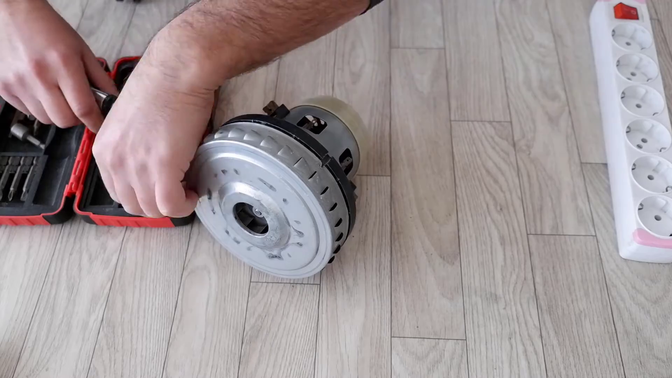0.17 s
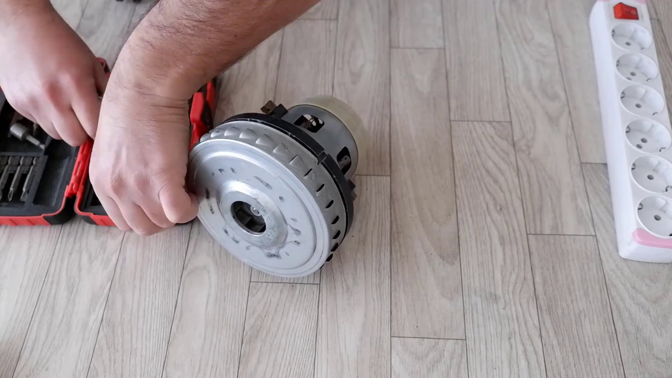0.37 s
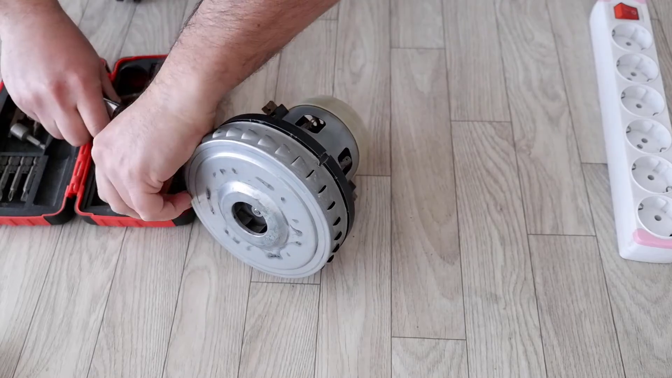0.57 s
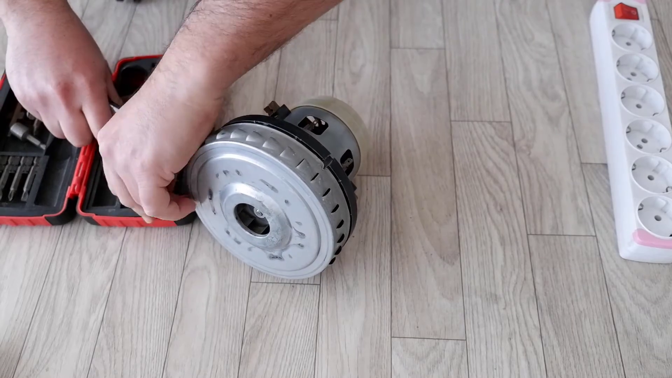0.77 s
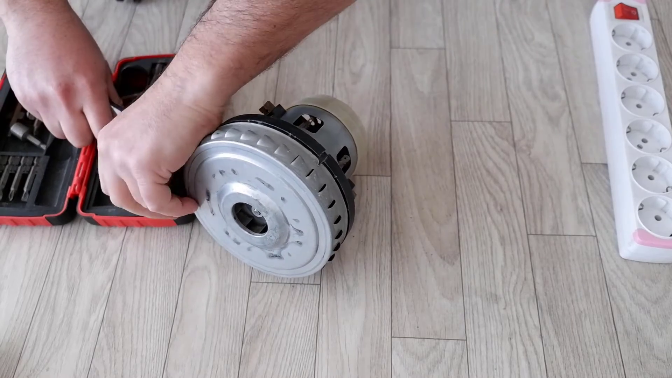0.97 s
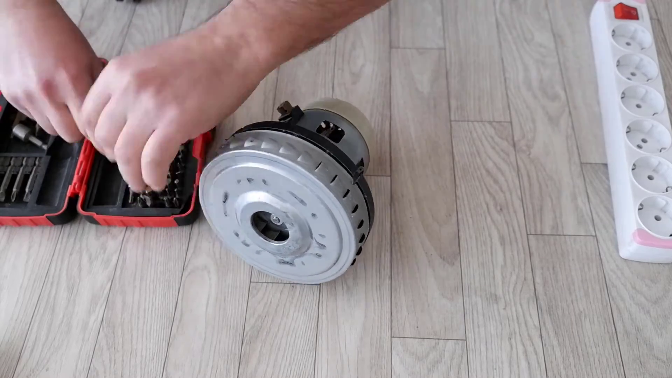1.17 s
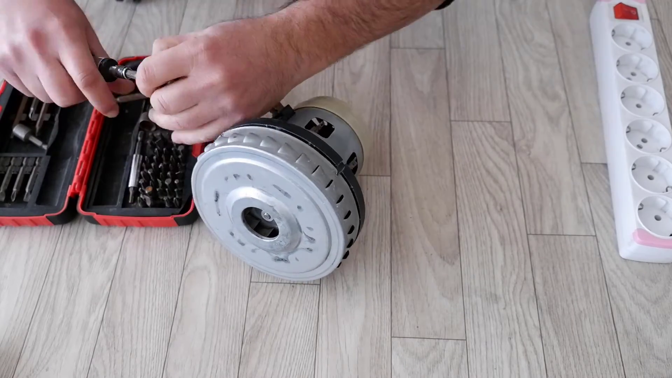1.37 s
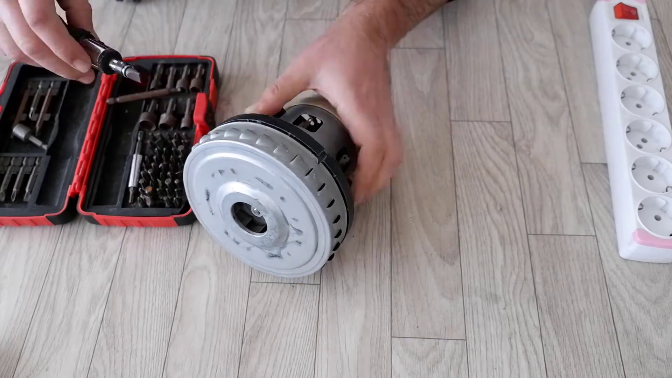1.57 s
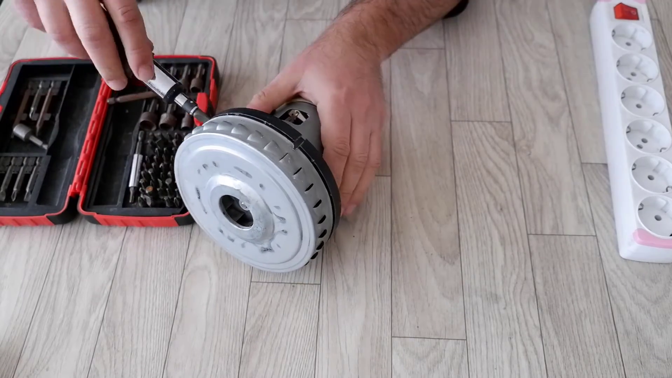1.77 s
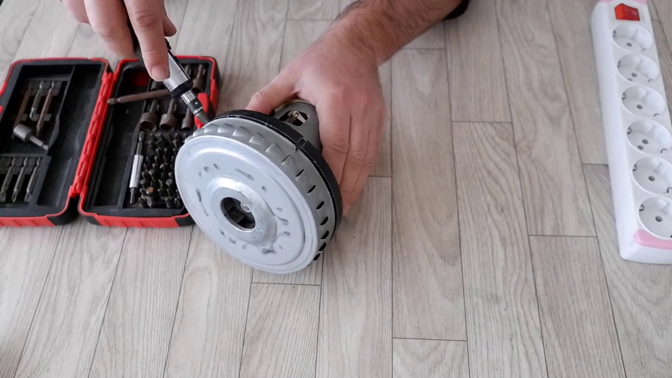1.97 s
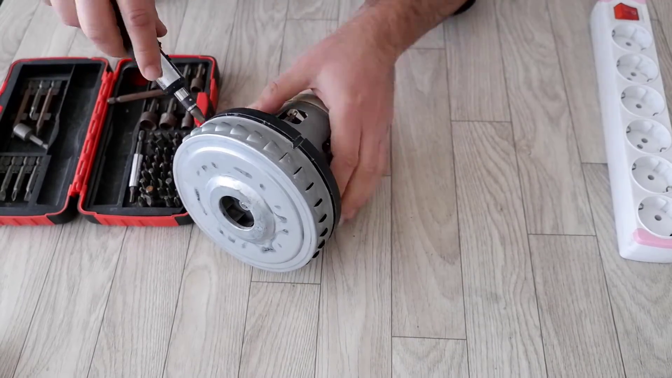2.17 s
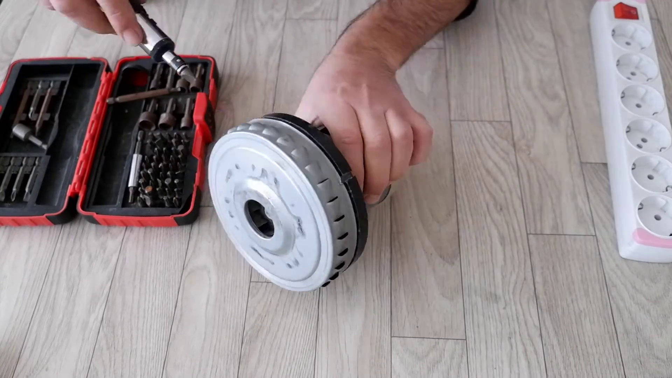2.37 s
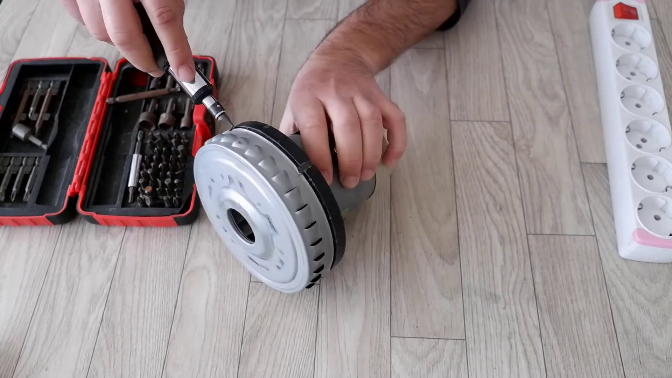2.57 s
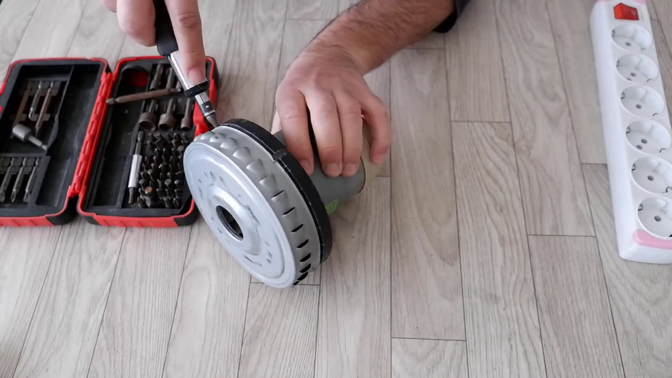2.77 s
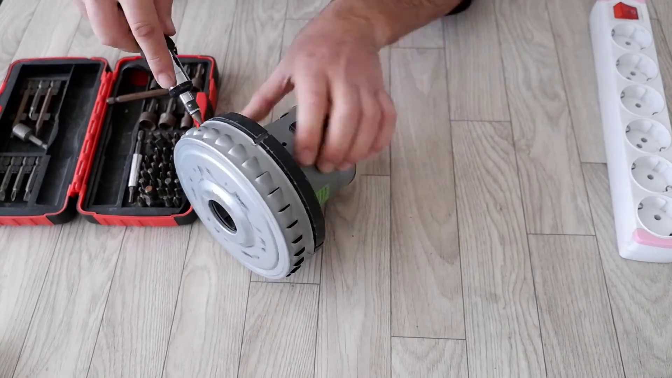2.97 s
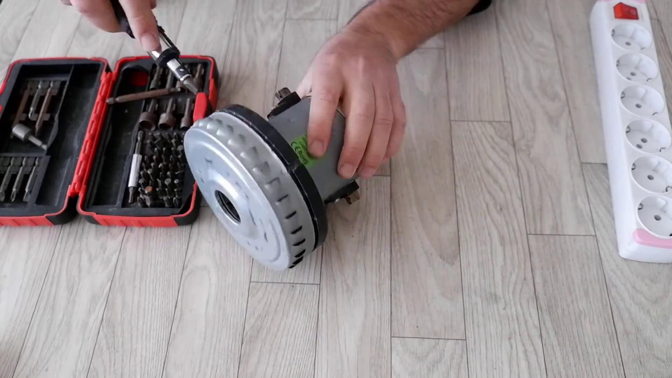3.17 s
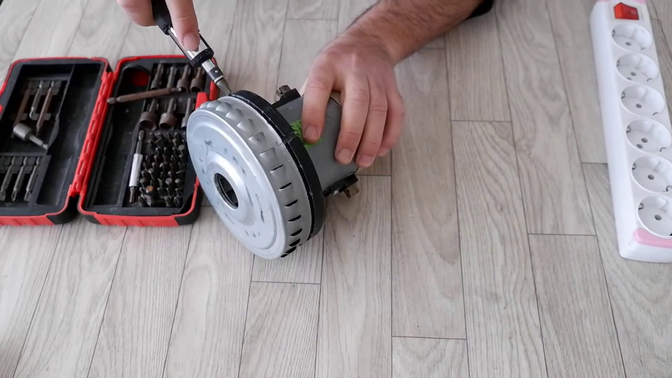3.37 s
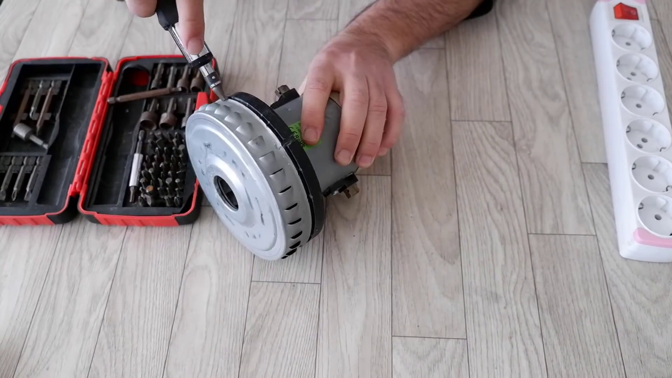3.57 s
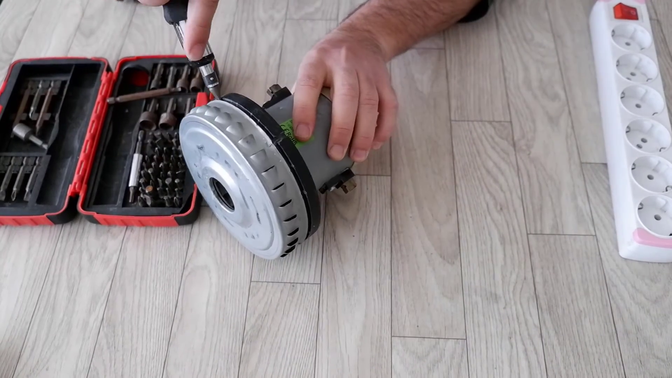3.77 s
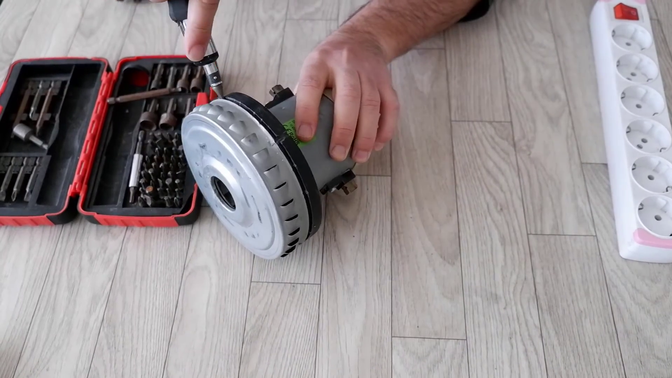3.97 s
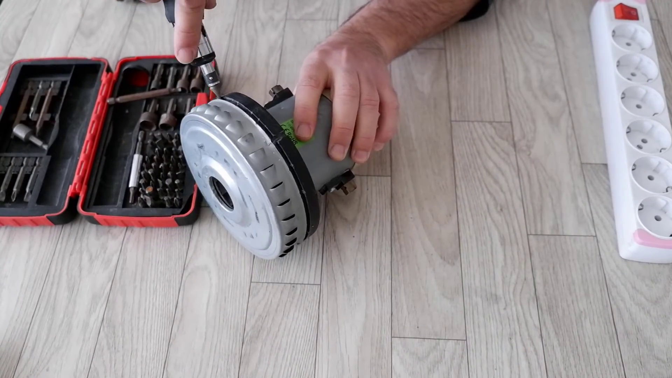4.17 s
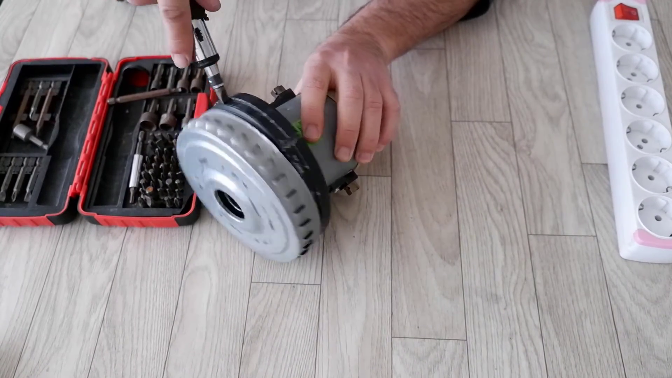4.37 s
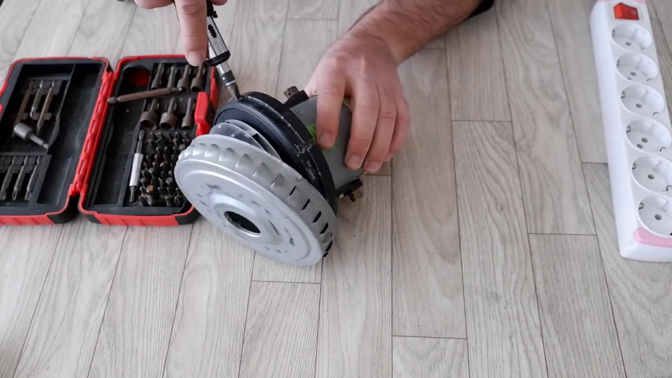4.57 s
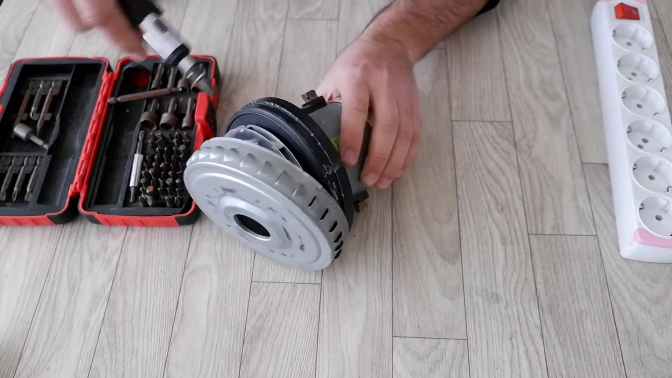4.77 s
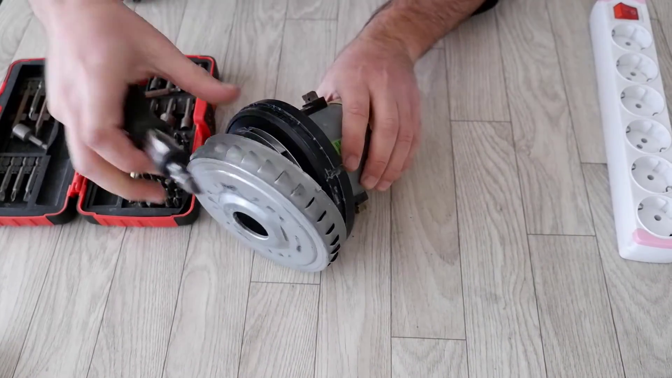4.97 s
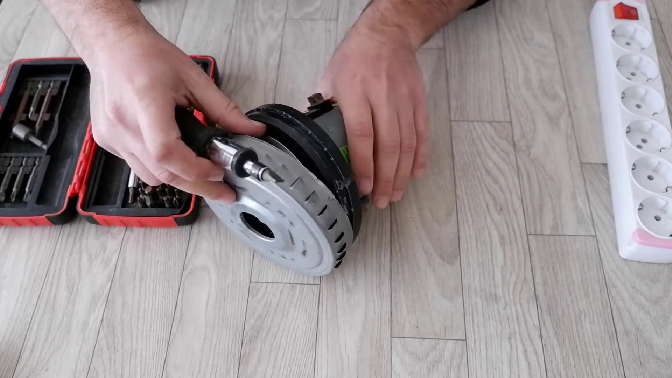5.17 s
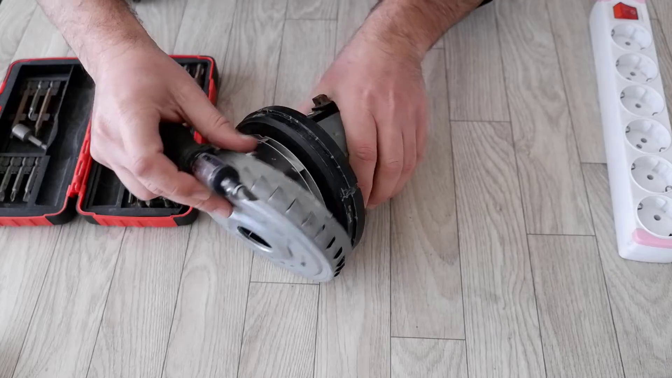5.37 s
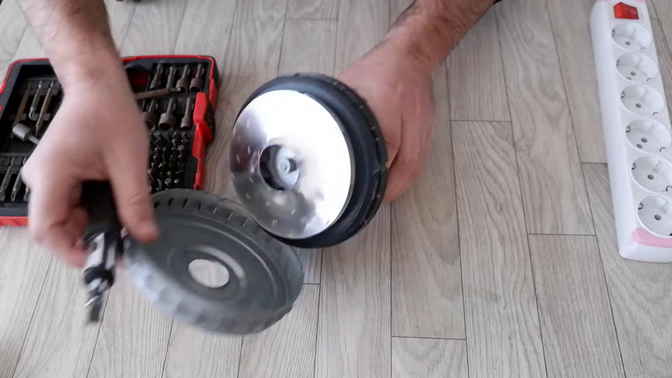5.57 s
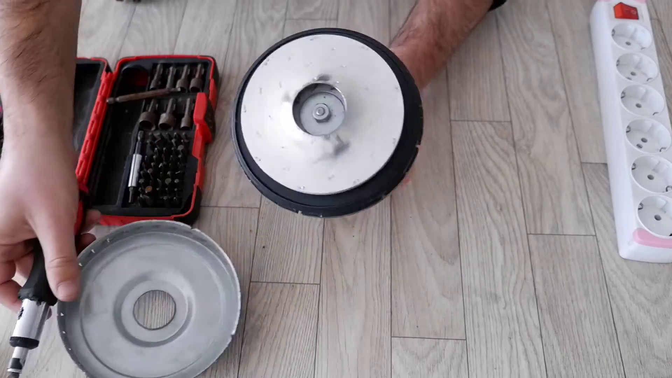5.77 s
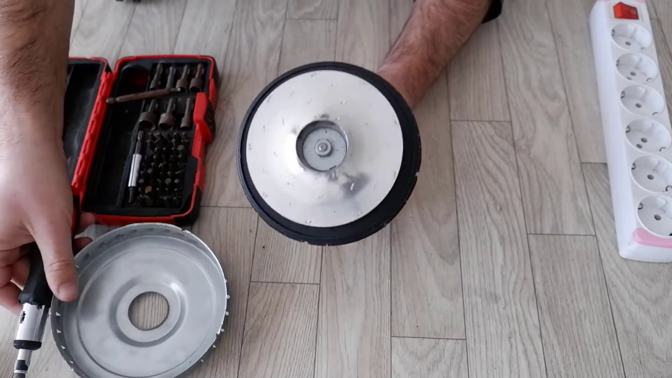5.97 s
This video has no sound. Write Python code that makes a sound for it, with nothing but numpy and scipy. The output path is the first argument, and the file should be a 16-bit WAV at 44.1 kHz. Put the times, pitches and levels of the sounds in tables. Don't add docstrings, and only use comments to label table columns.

```python
import sys
import numpy as np
from scipy import signal
from scipy.fft import rfft, irfft, next_fast_len
from scipy.io import wavfile
from scipy.ndimage import map_coordinates

SR = 44100
rng = np.random.default_rng(int(sys.argv[2]) if len(sys.argv) > 2 else 0)


def linear_from_db(decibels):
    return 10 ** (np.asarray(decibels, float) / 20)


def master(y):
    cut = np.clip(np.atleast_2d(y).T, -1, 1)
    pcm = np.round(cut * 32767)
    wavfile.write(sys.argv[1], SR, pcm.astype(np.int16))


N = 265041
BLOCK, SPAN, LEAD = 1024, 16384, 512
CUT_START_S, CUT_END_S = 3.860, 3.8688


def unit(x):
    return x / np.sqrt(np.mean(x ** 2) + 1e-20)


def peak(x):
    return x / (np.abs(x).max() + 1e-20)


def along(points, hz):
    f, v = np.transpose(points)
    return np.interp(np.log(hz + 1), np.log(f + 1), v)


def curves(rows):
    s, *cols = np.transpose(rows)
    return [np.interp(np.arange(N) / SR, s, c) for c in cols]


def wobble(rate):
    knots = rng.standard_normal(int(N * rate / SR) + 4)
    return map_coordinates(knots, [np.arange(N) * rate / SR])


def filtered(x, response):
    m = next_fast_len(x.shape[-1] + 4096)
    return irfft(rfft(x, m) * response(np.fft.rfftfreq(m, 1 / SR)), m)[..., :x.shape[-1]]


def noise(spectrum, alike):
    a, b = filtered(rng.standard_normal((2, N)), lambda hz: linear_from_db(along(spectrum, hz)))
    return unit(np.array([a, alike * a + np.sqrt(1 - alike ** 2) * b]))


def add(track, s, x):
    track[round(s * SR):][:len(x)] += x


# (time [s], peak level [dB], body [Hz], brightness [dB])
BIT_TAPS = [(0.039, -40, 3960, 1), (.149, -14.5, 2000, -7.5), (0.343, -20, 1850, -18),
            (.527, -34.5, 1660, -17.5), (0.576, -41.5, 2920, 0), (.924, -23.5, 3054, -8.5),
            (1.186, -36, 1456, -12.5), (1.254, -40.5, 2490, -7.5), (1.414, -29, 3630, -1.5),
            (1.555, -23.5, 2560, -1.5), (1.493, -62.5, 6100, 16), (1.547, -30.5, 2670, -16.5)]
# (time [s], peak level [dB], body [Hz], brightness [dB])
DEAD_TAPS = [(2.73, -43.5, 1170, -30), (3.29, -29.5, 1030, -36.5), (3.385, -19, 1960, -18),
             (3.802, -37.5, 2200, -43), (4.308, -35.5, 1024, -8.5), (4.828, -27, 1320, -28),
             (4.971, -18.5, 3630, -22), (5.177, -27, 2530, -7.5), (5.203, -17.5, 1865, -23),
             (5.281, -33.5, 2610, -10.5)]
# (time [s], peak level [dB], body [Hz], brightness [dB], ring [dB])
LIVE_TAPS = [(1.837, -26, 4830, -26, 3.5), (3.087, -30.5, 2240, -9, -5), (3.596, -38, 1950, -12, 6),
             (3.626, -23, 2150, -18.5, -1), (3.689, -34, 2350, -22, 17.5), (3.87, -43, 2280, -38.5, 1),
             (4.487, -10, 2330, -10.5, -5.5), (4.513, -21, 2050, 0, -4), (4.596, -8.5, 2130, -6.5, 2),
             (4.711, -22.5, 1430, -12.5, -9.5), (4.864, -33, 1740, -30, 5.5),
             (4.898, -25.5, 1750, -13.5, -5.5), (4.951, -25.5, 2130, -4.5, 1), (5.061, -37, 2380, -3.5, 3),
             (5.112, -29, 1710, -14, -5), (5.995, -27, 2350, -9, -4.5)]
# (time [s], peak level [dB], body [Hz], brightness [dB], ring [dB])
CRISP_TAPS = [
    (2.534, -39.5, 1330, -14, -6),
    (2.772, -34, 2450, -25.5, -32),
    (2.874, -32.5, 2180, -17, -2),
    (3.131, -22.5, 1170, -19, -21),
    (5.859, -14, 684, -6.5, 7.5),
]


def taps():
    out, t = np.zeros(N + SPAN), (np.arange(BLOCK * 3) - LEAD) / SR
    blow = (np.arange(LEAD + 1) == LEAD) * 1.
    rows = [(*row, -33, .034) for row in BIT_TAPS]
    rows += [(*row, -35, .029) for row in DEAD_TAPS]
    rows += [(*row, .072) for row in LIVE_TAPS]
    rows += [(*row, .0074) for row in CRISP_TAPS]
    for s, db, hz, bright_db, ring_db, t60 in rows:
        lead_in = linear_from_db(-24 + 2500 * t)
        fall = linear_from_db(-60 * t / np.clip(t60, .005, .2)) + 2.2 * linear_from_db(-60 * t / .005)
        onset = 1 - .9 * np.exp(-np.abs(t) / .0003)
        force = np.where(t < 0, lead_in, fall * onset)
        add(out, s - LEAD / SR - .0003, contact(s, db, hz, bright_db, ring_db, force, scatter_db=1, blow=blow))
    return out[:N]


# (start [s], peak level [dB], body [Hz], brightness [dB])
DEAD_SLIDES = [(.415, -47, 2116, -15.5), (.677, -47.5, 884, -12.5), (.906, -35, 2970, -8),
               (1.2, -44, 1990, -14), (1.27, -37.5, 930, -14), (1.404, -46, 4150, -4.5),
               (1.551, -36, 2570, -4.5), (1.885, -40, 1095, -5.5), (2.399, -37.5, 4480, -11),
               (2.742, -40, 1230, -11.5), (4.374, -43, 2020, -32.5), (5.401, -40, 2100, -3),
               (0.303, -37, 887, -24), (5.888, -44, 5280, 4)]
# (start [s], peak level [dB], body [Hz], brightness [dB], length [s])
LIVE_SLIDES = [(2.847, -48, 2100, -26, 0.028), (5.587, -34.5, 2260, -12.5, 0.049),
               (2.266, -38.5, 2570, -8.5, 0.052), (2.887, -41, 1050, -20, 0.05),
               (3.063, -47, 2290, -3.5, 0.1), (3.211, -40, 2220, -3, 0.065), (3.675, -29, 2300, -17, 0.053),
               (4.496, -20.5, 1280, -3, 0.066), (4.528, -21, 2370, -23, 0.048),
               (5.154, -37, 1660, -7, 0.097), (5.395, -48, 2100, 0, 0.11), (5.555, -33, 3310, -5.5, 0.097)]
# (start [s], peak level [dB], body [Hz], brightness [dB], length [s])
HOLDER_SLIDES = [
    (0.124, -22.5, 900, -20, 0.071),
    (0.133, -19, 1640, -28.5, 0.052),
]
# (start [s], peak level [dB], body [Hz], brightness [dB])
SINGING_SLIDES = [(1.955, -54.5, 5130, 4), (2.335, -50, 1870, -5), (2.659, -54, 1600, -26.5),
                  (3.113, -49, 1230, 2), (3.251, -52, 1290, 2), (3.481, -52.5, 2190, -18.5),
                  (3.871, -50, 2290, -45), (4.474, -18, 2216, -36)]
# (start [s], peak level [dB], body [Hz], length [s])
BRUSHES = [(0.015, -46.5, 2330, 0.053), (0.229, -60.5, 1600, 0.11), (0.556, -45, 3240, 0.04),
           (0.837, -59, 2780, 0.056), (0.987, -59, 980, 0.052), (1.233, -46.5, 3550, 0.042),
           (1.437, -52.5, 2000, 0.15), (1.739, -55, 2390, 0.036), (2.016, -51, 2310, 0.038),
           (2.497, -68, 4040, .13), (2.597, -56.5, 890, 0.034), (3.757, -50, 1810, 0.055),
           (3.818, -59, 2270, 0.053), (4.026, -55.5, 2115, 0.1), (4.243, -47.5, 2370, 0.038),
           (4.322, -47, 1000, 0.03), (4.419, -36, 1920, 0.088), (4.985, -56, 3740, 0.11),
           (5.22, -35.5, 1620, .057), (5.325, -41.5, 1340, 0.18), (5.496, -45.5, 2150, 0.14),
           (5.93, -37.5, 5350, 0.073), (2.083, -59.5, 2350, .11)]
# (start [s], peak level [dB], body [Hz], length [s])
RATTLES = [(1.884, -38, 4850, 0.044), (2.1, -57, 7600, 0.024), (4.477, -21, 2300, 0.018),
           (4.509, -17, 2200, 0.015), (3.3, -49.5, 2100, .02), (3.835, -54.5, 2000, 0.016),
           (3.92, -60, 2250, 0.021), (5.286, -42.5, 1400, 0.0089), (5.158, -47, 3300, .012),
           (5.428, -38, 2000, .03), (3.225, -43.5, 2400, 0.042), (2.5, -45, 2900, .012),
           (1.195, -45.5, 2200, 0.0081), (1.563, -33.5, 960, 0.011), (1.7, -58, 8100, 0.035),
           (0.34, -57, 5300, .015), (3.2, -61.5, 5700, 0.061), (.76, -60.5, 9300, 0.033),
           (.155, -23.5, 950, .03), (5.5, -49, 4350, 0.037), (2.418, -38.5, 3400, 0.026),
           (.165, -29, 2900, 0.027), (4.955, -33, 2060, 0.019), (.135, -33.5, 14500, .05),
           (.31, -45.5, 2700, .016), (4.6, -28, 2600, 0.015), (5.284, -40, 4600, .008),
           (6.001, -28, 850, .012), (2.05, -60, 12000, .1), (2.13, -57, 7300, .08), (.14, -30, 3250, .035),
           (1.824, -52, 2300, .014), (4.821, -30, 400, .012), (3.69, -40, 650, .04), (1.795, -56, 700, .02),
           (5.858, -36, 3400, .005)]


def slides():
    out = np.zeros(N + SPAN)
    rows = [(*row, .051, -35) for row in DEAD_SLIDES]
    rows += [(*row, -.5) for row in LIVE_SLIDES]
    rows += [(*row, -10.5) for row in HOLDER_SLIDES]
    rows += [(*row, .056, 5) for row in SINGING_SLIDES]
    rows += [(s, db, hz, -36 - .5631 * db, length, -12) for s, db, hz, length in BRUSHES]
    rows += [(s, db, hz, -12, length, -7) for s, db, hz, length in RATTLES]
    for s, db, hz, bright_db, length, ring_db in rows:
        force = stroke(length)
        add(out, s, contact(s, db, hz, bright_db, ring_db, force, scatter_db=1.5, blow=None))
    return out[:N]


def stroke(length):
    t = np.arange(BLOCK * 5) / SR
    fine = np.repeat(rng.standard_normal(len(t) // 64), 64)
    slips = np.interp(t * 130, np.arange(20), rng.standard_normal(20))
    swell = np.sin(np.pi * np.clip(t / length, 0, 1) ** 0.71) ** 0.77
    return swell * linear_from_db(0.77 * fine + 4.0 * slips)


def resonance(f, centre, width):
    return 1j * f * width / (centre * centre - f * f + 1j * f * width)


# (frequency [Hz], level per Hz [dB])
CRACK = [(180, -49), (300, -14.5), (2610, -3.5), (3500, -8), (6520, -6.5), (8220, -17), (11500, -23.5),
         (15200, -15)]


def contact(s, db, hz, bright_db, ring_db, force, scatter_db, blow):
    white = rng.standard_normal(len(force))
    burst = force * white
    chance = rng.random((24, 2, 1))
    local_hz, local = 500 * 26 ** chance[:, 0], linear_from_db(14 * chance[:, 1] - 9)
    lift = linear_from_db(-3 - along(CRACK, hz))

    def crack(f):
        return linear_from_db(along(CRACK, f))

    def spot(f):
        struck = 1.7 * lift * resonance(f, hz, .13 * hz)
        return crack(f) * (.3 + struck + .55 * np.sum(local * resonance(f, local_hz, 90), 0))

    span = SPAN if ring_db > -19 and s > STATES[0] else SPAN // 4
    coloured = filtered(burst, spot)
    body = filtered(coloured, lambda f: 1 / (1 + (f / 5000) ** 6))
    out = linear_from_db(ring_db) * ringing(s, hz, burst if blow is None else blow, scatter_db, span)
    if blow is not None:
        fade = linear_from_db(-60 * np.arange(SPAN - LEAD) / SR / 0.79)
        crowd = filtered(np.resize(white, SPAN - LEAD) * fade, crack)
        crowd_db = min(ring_db, 1) - 25.0 - 8 * (s > STATES[-2])
        out[LEAD:] += linear_from_db(crowd_db) * peak(crowd)
    out[:len(force)] += peak(body) + linear_from_db(bright_db + 5.0) * peak(coloured - body)
    return linear_from_db(db) * out


# (frequency [Hz], level [dB], t60 [s])
BITS = [(6460, 0, .045)]
TOUCHED = [(350, -6, .08), (845, -4, .1), (1728, -8, .15), (2250, -3, .05), (2799, -2, .06),
           (3640, -4, .11), (4404, -8, .06), (4850, 0, .045), (4920, -3, .05), (5400, -9, .06),
           (6982, -10, .06)]
TURNED = [(350, -10, .06), (1230, -2, .05), (1735, -10, .1), (2130, -3, .04), (2400, -4, .05),
          (2790, -9, .04), (3630, -9, .09), (4500, -10, .04)]
GRIPPED = [(350, -8, .1), (690, -8, .1), (925, -17, .3), (1230, -5, .04), (1690, -13, .2), (7600, -12, .05),
           (2130, -3, .045), (2350, -1, .06), (2790, -10, .06), (3445, -15, .12), (3630, -12, .08),
           (3930, -12, .05)]
PRIED = [(350, -10, .1), (684, -14, .2), (969, -9, .3), (1750, -14, .3), (1900, -9, .05), (2290, -2, .16),
         (2562, -2, .2), (3618, -20, .3), (4425, -15, .4), (5222, -12, .12), (5519, -8, .5),
         (6503, -14, .08), (7063, -22, .1), (9873, -22, .1)]
LOOSE = [(972, -10, .3), (350, -12, .15), (1750, -7, .42), (2060, -5, .05), (2299, -5, .09),
         (2558, -7, .14), (2751, -2, .3), (3445, -4, .5), (3618, -6, .25), (3984, -12, .38),
         (4479, -11, .4), (4835, -13, .23), (5521, -8, .25), (6304, -14, .3)]
LEANING = [(690, -12, .12), (974, -16, .12), (1745, -5, .2), (2060, -3, .05), (2299, -5, .06),
           (2600, -4, .08), (2751, -6, .12), (3300, -6, .05), (3618, -10, .1), (3984, -12, .15),
           (4440, -12, .15), (5521, -14, .15)]
HELD = [(684, -9, .12), (2290, 0, .13), (2580, -3, .1), (3200, -6, .05), (6540, -10, .07)]
LAID = [(350, -6, .09), (226, -14, .12), (485, -12, .12), (570, -14, .1), (684, -5, .22), (972, -8, .22),
        (1707, -26, .2), (2285, -22, .2), (2584, -15, .13), (2692, -22, .25)]
STATES = [
    1.8,
    2.22,
    3.33,
    4.4,
    4.594,
    4.822,
    5.35,
    5.85,
    7,
]


def ringing(s, hz, drive, scatter_db, span):
    state = np.searchsorted(STATES, s)
    grips = [BITS, TOUCHED, TURNED, GRIPPED, PRIED, LOOSE, LEANING, HELD, LAID]
    freq, level, t60 = np.transpose(grips[state])[..., None]
    t = np.arange(span) / SR
    nearby_db = 7 * np.exp(-(np.log(freq / hz) / .05) ** 2)
    strength_db = level + nearby_db + scatter_db * rng.standard_normal((20, 1))[:len(freq)]
    knots = rng.standard_normal((20, 24))[:len(freq)]
    flutter_db = 1.1 * np.array([np.interp(t * 55, np.arange(24), k) for k in knots])
    decay_db = -60 * t / np.minimum(t60, .6)
    modes = np.sum(linear_from_db(strength_db + flutter_db + decay_db) * np.sin(2 * np.pi * freq * t), 0)
    stilled = linear_from_db(-600 * np.maximum(s + t - STATES[state], 0))
    rung = peak(signal.fftconvolve(modes, drive)[:span]) * stilled
    return np.pad(rung, (0, SPAN - span))


# (start [s], peak level [dB], frequency [Hz], length [s])
SONGS = [(.128, -36, 6460, .04), (.14, -24, 6460, .05), (.328, -50, 6460, .045), (4.498, -28, 5519, .03),
         (4.506, -20, 5519, .066), (4.55, -30, 5519, .046), (4.5, -24, 2290, .068), (4.52, -25, 2558, .048),
         (4.52, -34, 4424, .075), (3.4, -57, 1690, .07), (3.495, -56, 1690, .08), (3.69, -47, 1690, .12),
         (3.87, -60, 1692, .17), (3.87, -63, 925, .15), (4.477, -25, 1920, .02), (4.481, -24, 2600, .018),
         (1.85, -60, 3635, .1), (1.835, -38, 2815, .02), (1.835, -38, 4850, .02), (1.9, -52, 350, .03),
         (2.11, -69, 2330, .09), (3.71, -52, 3445, .07), (4.895, -42, 1745, .06), (5.11, -46, 1745, .07),
         (5.06, -56, 4440, .07), (4.98, -54, 5250, .08), (5.42, -45, 6700, .045), (5.42, -47, 5900, .045),
         (5.11, -47, 2600, .06), (3.384, -25, 2120, .016), (3.384, -33, 1360, .016),
         (2.727, -43, 1200, .02), (2.74, -48, 1230, .04), (2.865, -44, 1220, .022),
         (3.122, -37, 1200, .022), (.845, -55, 2780, .022), (2.67, -54, 1730, .06),
         (3.085, -38, 2400, .025), (4.5, -30, 970, .095), (4.48, -28, 2600, .04), (4.511, -20, 2000, .008),
         (4.895, -40, 3300, .016), (4.95, -33, 2060, .016), (.272, -59, 3300, .04),
         (.1485, -17, 2600, .003), (.148, -30, 5200, .004), (.15, -38, 2950, .04), (3.625, -40, 7600, .02),
         (3.255, -52, 7550, .025), (5.735, -62, 2600, .07), (5.74, -64, 6600, .06), (5.75, -64, 975, .07),
         (5.565, -50, 3220, .06), (.135, -32, 1750, .04), (.142, -46, 7900, .025)]


def songs():
    out, rough = np.zeros(N + SPAN), linear_from_db(2.5 * wobble(140))
    for s, db, hz, length in SONGS:
        t = np.arange(int(length * SR)) / SR
        now = t + round(s * SR) / SR
        tone = np.sin(2 * np.pi * hz * now) + .2 * np.sin(2 * np.pi * (hz + 37) * now)
        swell = np.abs(np.sin(np.pi * (t / length) ** .55))
        add(out, s, linear_from_db(db) * swell * tone * rough[round(s * SR):][:len(t)])
    return out[:N]


# (time [s], peak level [dB], frequency [Hz])
KNOCKS = [(0.525, -32.5, 323), (0.688, -36, 169), (1.577, -47.5, 71), (1.896, -42, 347),
          (2.338, -41.5, 141), (2.532, -32.5, 107), (3.258, -28, 99), (3.288, -17, 104.4),
          (3.619, -38.5, 342), (3.683, -36, 356), (4.308, -38, 77), (5.175, -36.5, 135), (5.86, -15, 355),
          (6.002, -27, 158)]
# (time [s], peak level [dB], frequency [Hz])
LANDINGS = [(0.14, -31, 296), (.341, -42, 167), (0.993, -47.5, 69.6), (1.182, -34.5, 161),
            (1.295, -41, 100), (2.595, -32.5, 112.5), (2.896, -42.5, 359), (3.08, -39, 292),
            (4.485, -20, 356), (4.528, -22, 58.1), (4.823, -20.5, 84.2), (4.87, -29, 117.7),
            (4.898, -34.5, 323), (5.11, -35.5, 124), (5.19, -26, 121.5), (5.284, -30.5, 118.7)]


def boards():
    out, t = np.zeros(N + SPAN), np.arange(BLOCK * 8) / SR
    rows = [(*row, .055) for row in KNOCKS] + [(*row, .16) for row in LANDINGS]
    for s, db, hz, t60 in rows:
        floor_mode = np.sin(2 * np.pi * 118 * t + rng.uniform(0, np.pi))
        push = np.sin(2 * np.pi * hz * t) + 0.071 * floor_mode

        def dull(f):
            return 1 / (1 + (f / 350) ** 1.74) / (1 + (.3 * hz / (f + 1)) ** 4)

        puff = unit(filtered(rng.standard_normal(len(t)), dull))
        shape = linear_from_db(-60 * t / t60) * (1 - np.exp(-t / 0.0015))
        add(out, s, linear_from_db(db) * peak((push + 0.63 * puff) * shape))
    return out[:N]


def splice_ticks():
    ticks, at = np.zeros(N), np.arange(663, int(CUT_START_S * SR), BLOCK)
    level = linear_from_db(-35.0 + 3.5 * rng.standard_normal(len(at)))
    ticks[at] = level * rng.choice([-1, 1], len(at))
    return filtered(ticks, lambda f: (f / 15000) ** 4.5)


# (frequency [Hz], t60 [s])
WALLS = [(200, 0.32), (2000, 0.14), (10000, 0.023)]


def room(x):
    hz, t, z = signal.stft(rng.standard_normal((2, SR // 2)), SR, nperseg=256)
    decay = linear_from_db(-60 * t / along(WALLS, hz)[:, None])
    tail = signal.istft(z * decay, SR, nperseg=256)[1]
    delayed = np.pad(x, (150, 0))[None]
    return signal.fftconvolve(delayed, tail / np.linalg.norm(tail[0]), axes=1)[:, :N]


# (time [s], rustle level [dB], rumble level [dB])
STIR = [(0.0, -65.5, -57), (0.33, -58, -47.5), (1.25, -67.5, -58), (3.68, -63.5, -47.5), (3.97, -70, -53.5),
        (4.32, -55.5, -46.5), (4.65, -41.5, -37.5), (4.85, -51.5, -45), (5.3, -54.5, -46), (5.86, -60, -50),
        (6.01, -43.5, -38)]
# (frequency [Hz], level per Hz [dB])
CLOTH = [(240, -54.5), (400, -11), (2180, -9), (3600, -13.5), (5410, -14), (9000, -25.5), (11700, -28),
         (19800, -120)]
# (frequency [Hz], level per Hz [dB])
RUMBLE = [(12, -31), (20, 3.5), (140, -4.5), (208, -8), (295, -5), (900, -22), (1170, -23.5), (1980, -120)]
# (frequency [Hz], level per Hz [dB])
HISS = [(500, -27.5), (895, 2.5), (1040, -9), (1700, -24.5), (2830, -19), (9180, -22.5), (15100, -12),
        (16200, -20.5)]
# (time [s], level [dB])
HISS_DB = [(0, -70.5), (3.8, -71), (3.95, -74), (4.1, -65), (6, -63)]


def background():
    rustle_db, rumble_db = curves(STIR)
    stir_db = 3.2 * wobble(28) + wobble(5.3)
    rustle = linear_from_db(rustle_db - 3.0 + stir_db + [[3.5], [-4.5]]) * noise(CLOTH, 0.17)
    wander_db = 2.5 * wobble(14) + 2 * wobble(4)
    rumble = linear_from_db(rumble_db - 7.0 + wander_db + [[2.5], [-.5]]) * noise(RUMBLE, 0.23)
    hiss = linear_from_db(curves(HISS_DB)[0]) * noise(HISS, 0.012)
    return rustle + rumble + hiss


# (time [s], left over right level [dB])
PLACE = [(0, 9), (.1, 0), (.2, 0), (.3, 12), (1.3, 11), (1.5, 7), (1.8, 13), (5.7, 12), (5.9, 16)]


def scene():
    steel, thuds = taps() + slides() + songs(), boards()
    right = linear_from_db(-curves(PLACE)[0])
    bounce = linear_from_db(-19.5 - 60 * np.arange(900) / SR / .03) * np.diff(rng.standard_normal((2, 901)))
    first, second = signal.fftconvolve(steel[None], bounce, axes=1)[:, :N]
    turn = 2 * wobble(6)
    reflected = np.cos(turn) * first + np.sin(turn) * second
    late = np.pad(steel + linear_from_db(-14.5) * thuds, (20, 0))[:N]
    far = late + (.75 + right) * reflected
    far = filtered(far, lambda f: 1 / (1 + (f / 10700) ** 2))
    pair = np.array([steel + thuds, .68 * right * far]) * 2 / (1 + .6 * right)
    return pair + linear_from_db([[-17], [-19]]) * room(steel + linear_from_db(-9.5) * thuds) + background()


def low_pass(x):
    return signal.sosfilt(signal.butter(12, 16670, fs=SR, output="sos"), x)


def record(dry):
    t = np.arange(N) / SR
    fade_out = (CUT_START_S + 0.0015 - t) / 0.0081
    fade_in = (t - CUT_END_S) / 0.00084
    gap = np.clip(np.maximum(fade_out, fade_in), .05, 1)
    x = (dry + [[1], [0]] * splice_ticks()) * gap
    x = filtered(x, lambda f: np.where(f < 15900, 1, .04))
    x = x / (1 + np.abs(x) ** 8) ** (1 / 8)
    return low_pass(x)


dry = scene()
out = record(dry)
master(out)
```